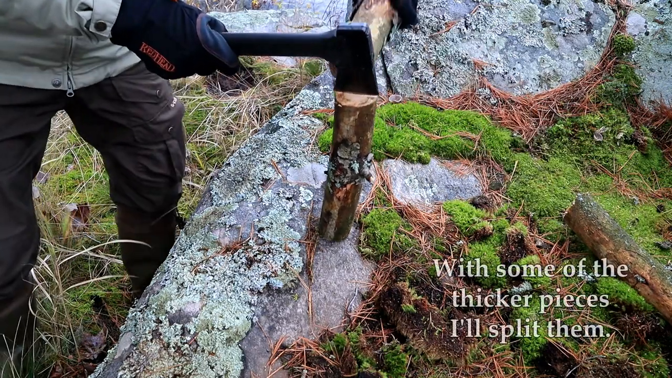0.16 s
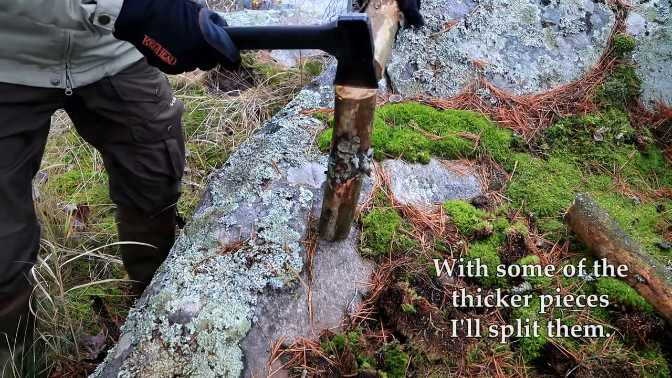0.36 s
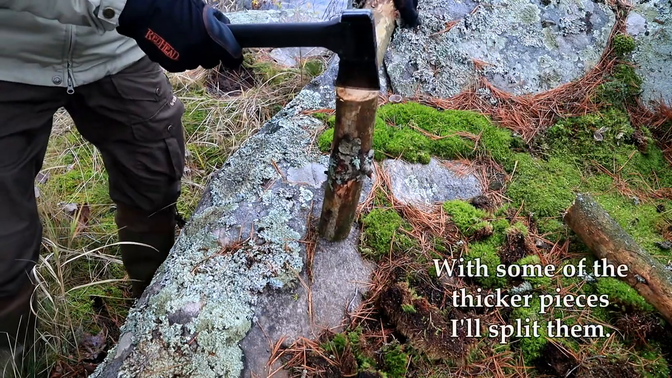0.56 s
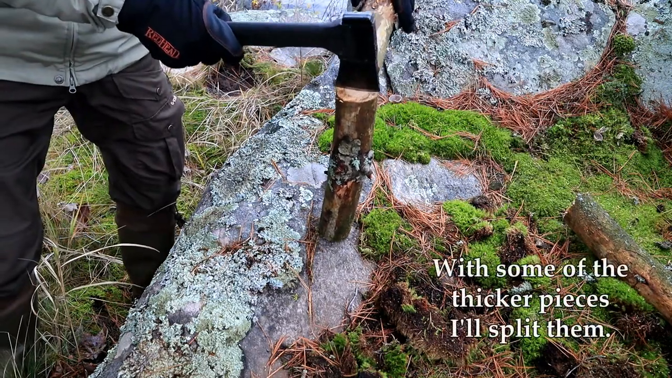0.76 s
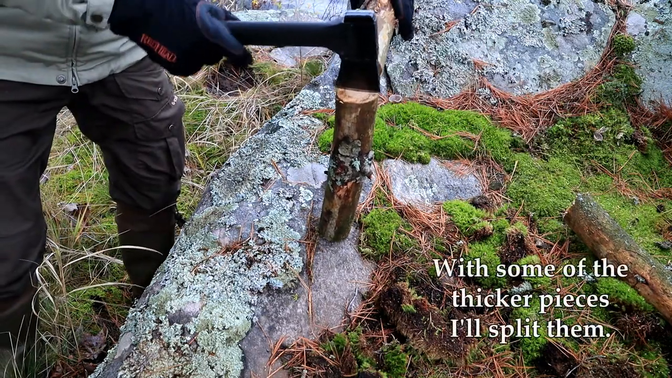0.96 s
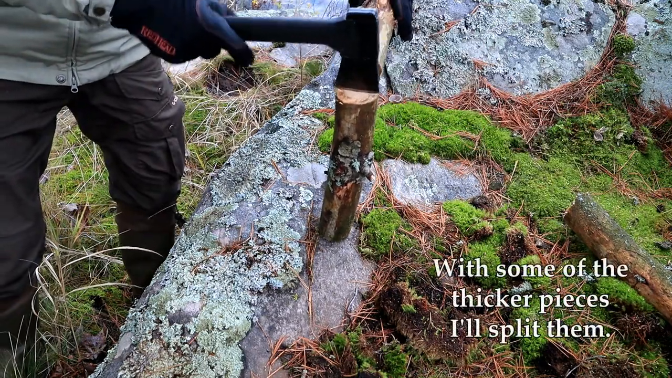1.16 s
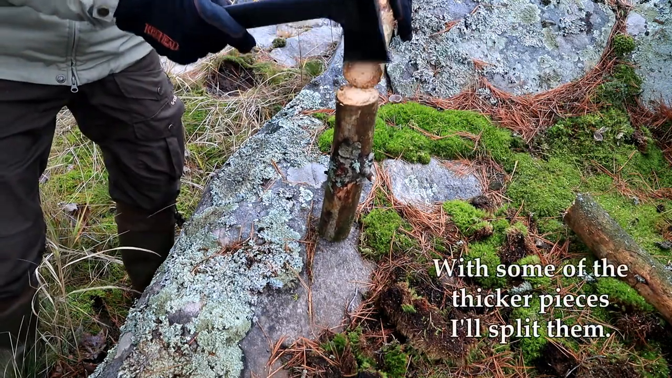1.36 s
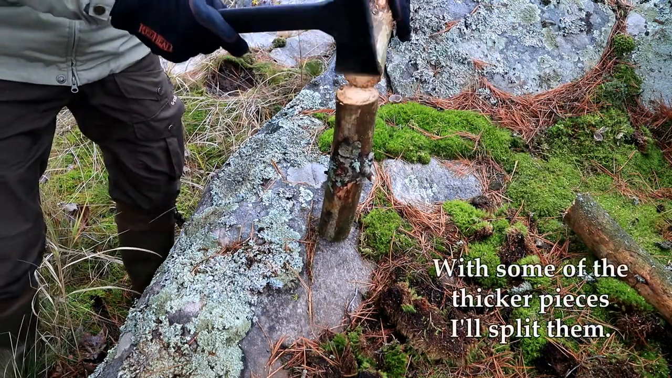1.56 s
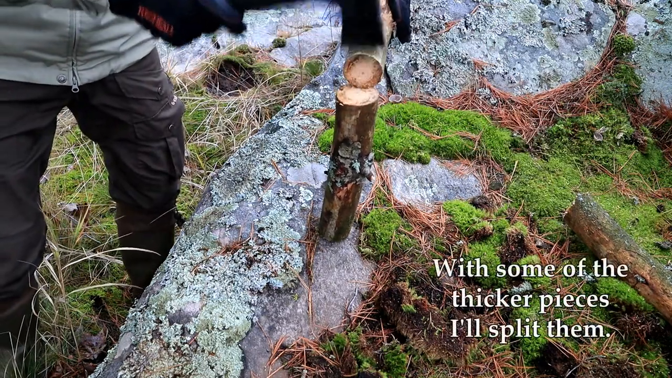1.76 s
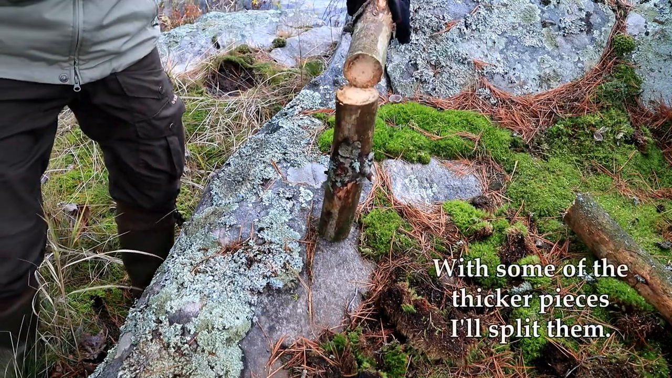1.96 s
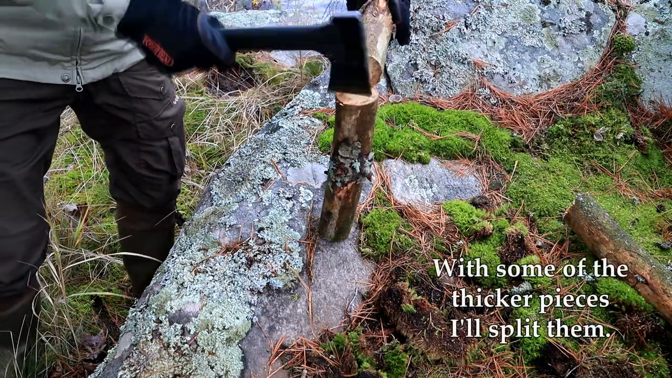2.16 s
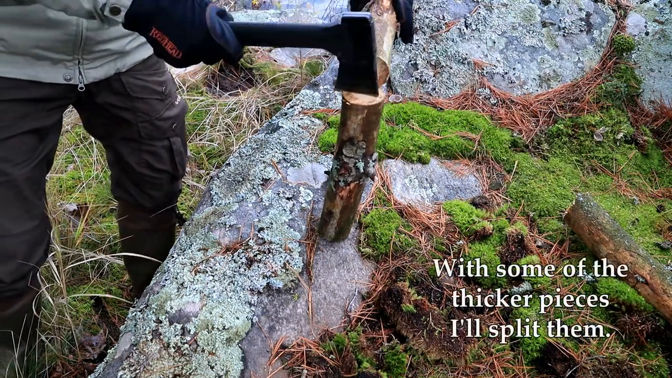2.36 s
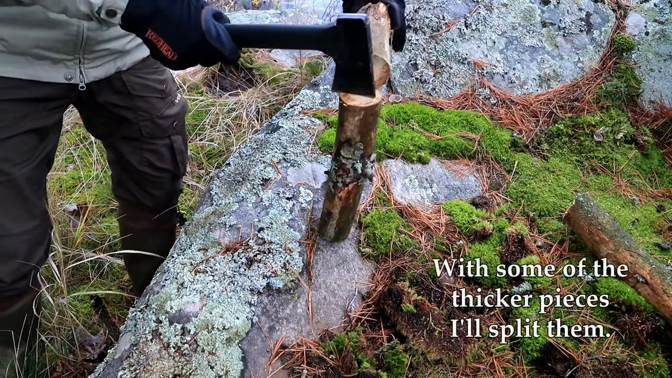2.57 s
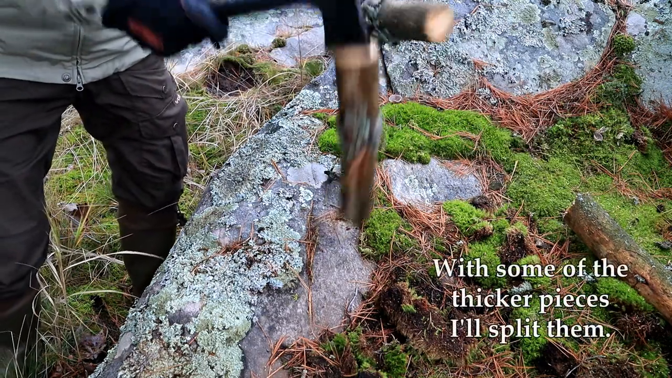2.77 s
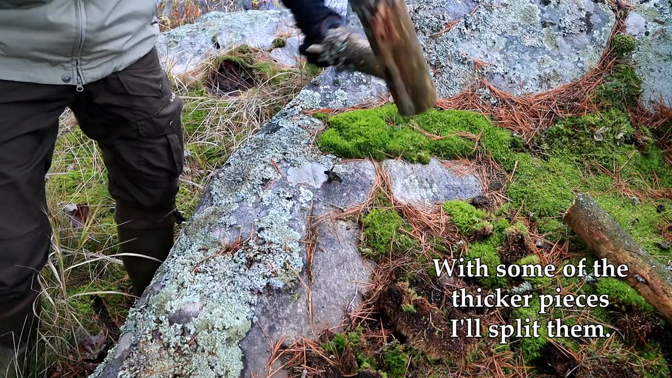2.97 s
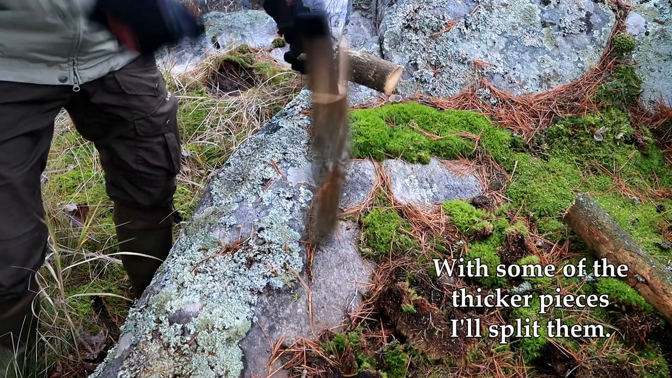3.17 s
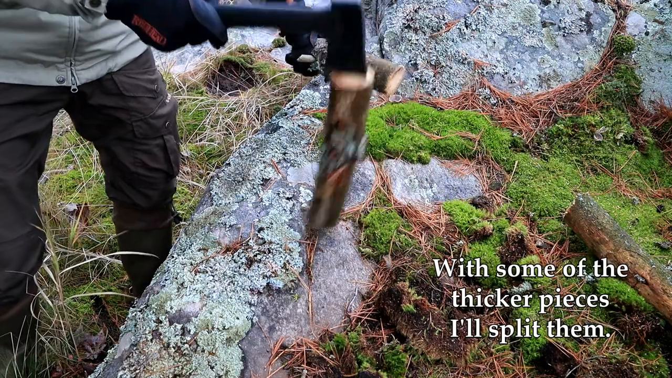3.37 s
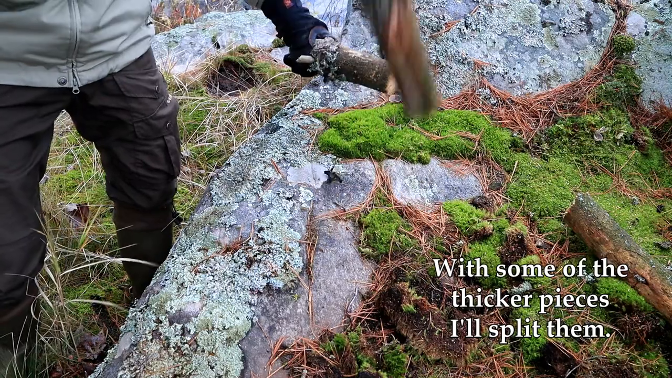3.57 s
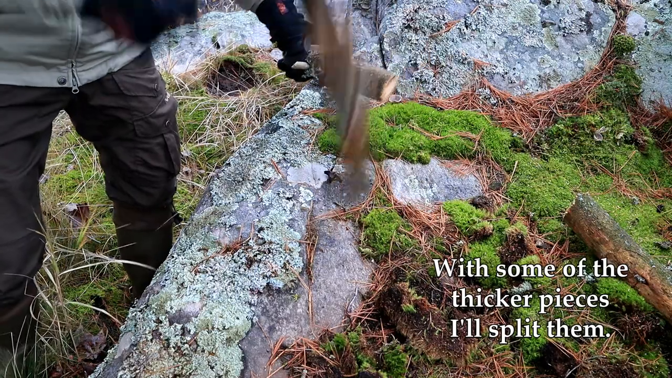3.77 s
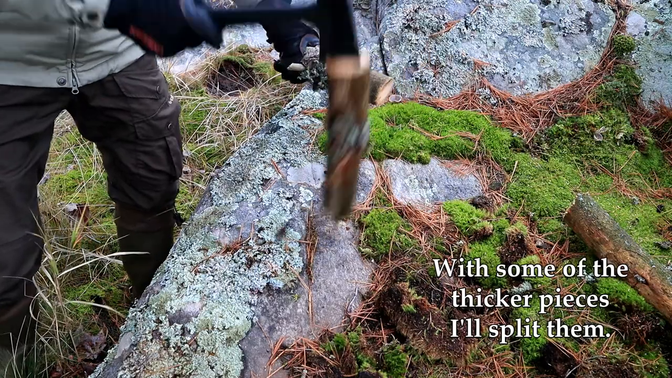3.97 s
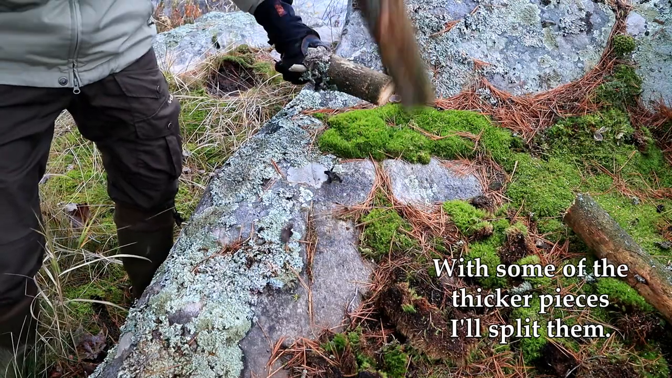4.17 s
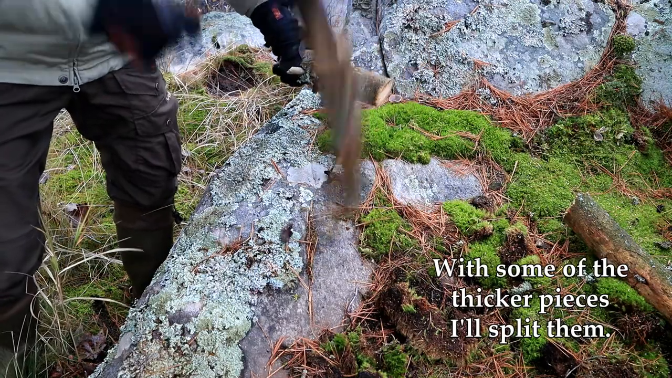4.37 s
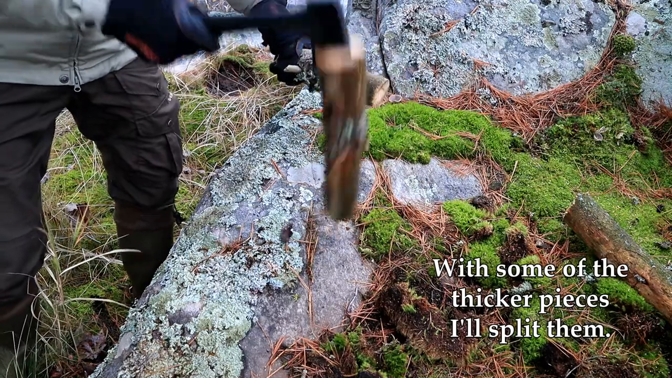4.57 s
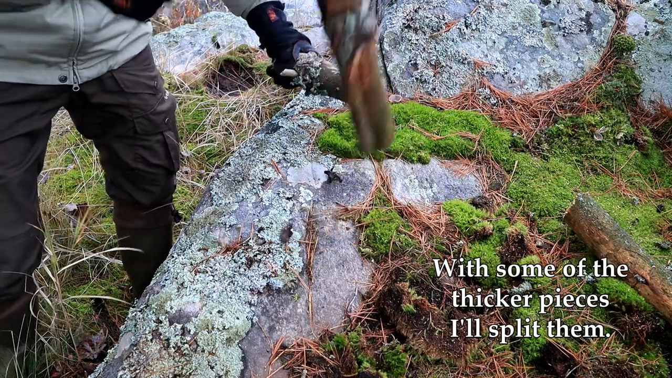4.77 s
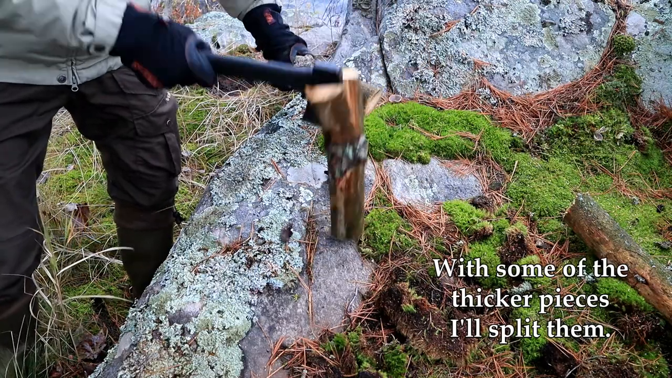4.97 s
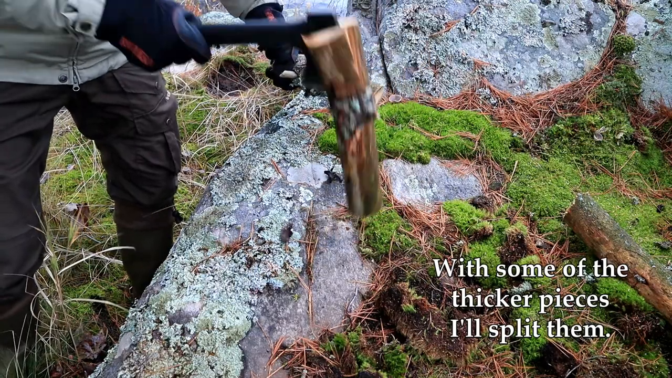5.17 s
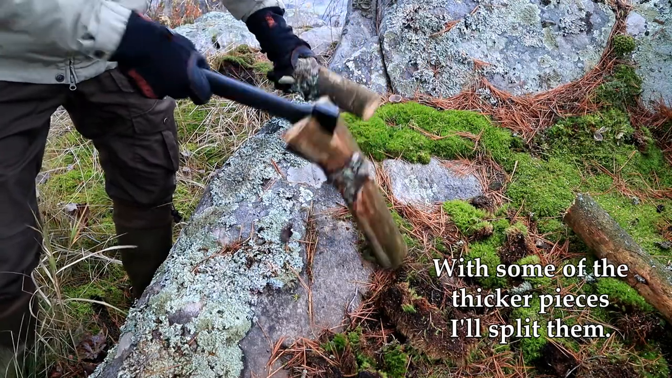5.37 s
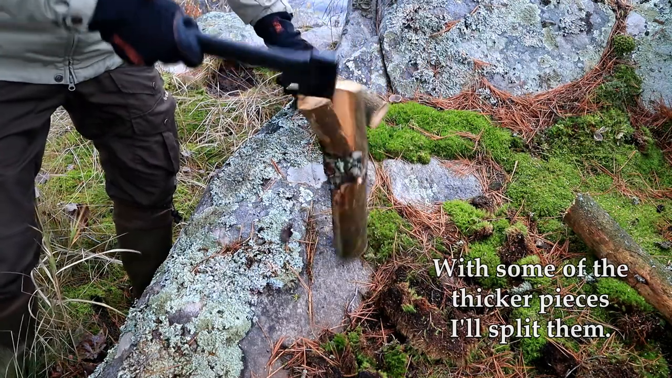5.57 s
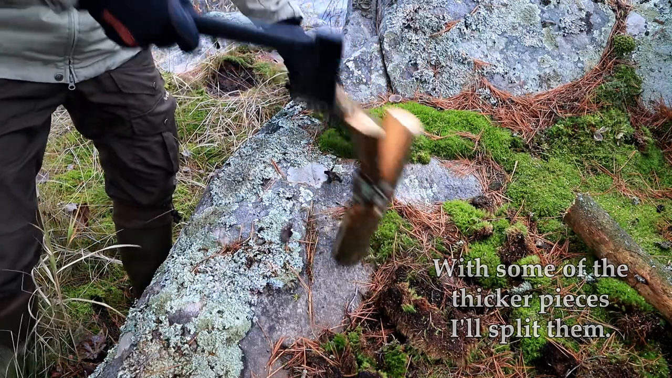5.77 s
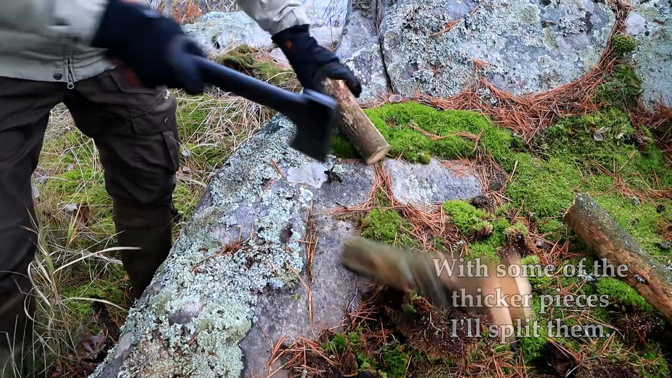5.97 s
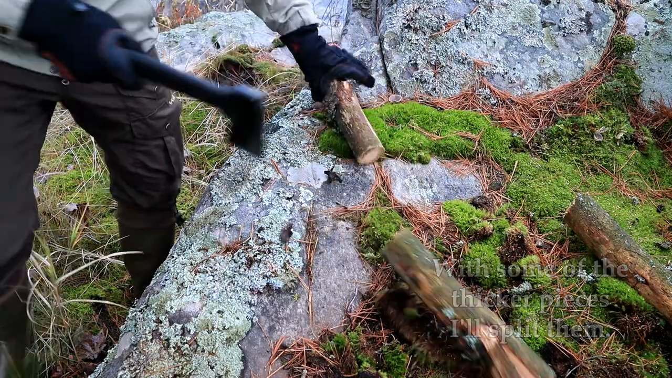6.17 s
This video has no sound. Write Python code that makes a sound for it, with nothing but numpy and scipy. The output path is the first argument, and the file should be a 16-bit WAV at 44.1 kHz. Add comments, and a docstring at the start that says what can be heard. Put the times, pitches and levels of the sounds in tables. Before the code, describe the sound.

Close, hard knocks of a log and hatchet on stone end in splintering wood, over a faint forest wash and light wind.

```python
"""A faint scuff and a light knock: a hatchet is set in a short log. The log is then knocked on bare rock
until it splits and a half drops into the moss. Each blow layers a woody ring, a ground thump and a crunch;
the handle hums after the hard ones, and fibres crack and tear. Rock and trunks throw the sound back over
rustling clothes, a bed of far trees and wind brushing the microphone.
The close blows overload the recorder, whose gain ducks and comes back."""
import sys
import numpy as np
from scipy import signal
from scipy.fft import rfft, irfft, next_fast_len
from scipy.io import wavfile
from scipy.ndimage import minimum_filter1d

SR = 44100
rng = np.random.default_rng(int(sys.argv[2]) if len(sys.argv) > 2 else 0)


def log_audio(samples):
    """Write samples as a 16-bit WAV file to the path given in sys.argv[1]."""
    # one column per channel
    frames = np.atleast_2d(samples).T
    # limit to full scale, then quantise
    limited = np.clip(frames, -1, 1)
    pcm = np.round(limited * 32767).astype(np.int16)
    wavfile.write(sys.argv[1], SR, pcm)


N = 274516
TIME = np.arange(N) / SR

# the blows: t/s, knock level/dB, contact f/Hz, log pitch/ratio, thump/dB, crunch/dB, hum/dB, steel/dB
BLOWS = [(0.3525, -5.3, 1230, 0.95, -32, -35, -60, -70), (2.2013, 8.0, 860, 0.95, -2.5, -7, -12.5, -65),
         (3.2341, 6.5, 950, 0.78, 9, -2.8, -19, -72), (3.8800, 9.6, 900, 0.95, 4.5, -6.5, -17.5, -72),
         (4.4587, 6.3, 1400, 1.03, 3.6, -3, -50, -50), (4.9549, 10.5, 600, 0.74, -10, -11, -50, -64)]
# ringing modes: f/Hz, level/dB, t60/s
LOG_MODES = [(380, -14, .03), (560, -4.5, .021), (757, -2.5, .018), (1030, -5.5, .024), (1423, -5, .024),
             (1646, -3.2, .023), (1976, -3, .021), (2492, -10.5, .02), (2786, -10, .016),
             (3367, -1.5, .023), (3737, 0, .022), (4906, -7, .016)]
GROUND_MODES = [(92, 0, .016), (175, -3, .016)]
HANDLE_MODES = [(308.8, 0, .3), (312.2, 0, .3)]  # two bending planes beat, so the hum swells before it dies
STEEL_MODES = [(1810, -8, .45), (2270, -5, .45), (3540, -2, .7), (3645, 0, .8), (3760, -3, .7)]
# faint, bright ticks just after hard blows (at 2.296 s and 3.949 s); the other rows are fibres and bark
# giving way: t/s, level/dB, t60/s, brightness f/Hz
CRACKS_AND_TICKS = [(0.035, -35, .06, 1000), (0.682, -44, .01, 8000), (1.784, -37, .025, 7000),
                    (1.946, -40, .03, 800), (2.296, -36, .012, 16000), (3.001, -41, .02, 9000),
                    (3.949, -38, .025, 12000), (4.465, -10, .028, 900), (4.9585, -4, .022, 1900),
                    (4.9646, -1, .018, 2800), (4.9768, -8, .02, 6000), (4.9814, -13, .02, 8000),
                    (5.3935, -26, .05, 5000), (5.3970, -15, .045, 3500), (5.4103, -14, .02, 10000),
                    (5.4135, -21, .025, 10000), (5.4481, -11, .013, 15000), (5.5446, -41, .025, 9000),
                    (5.568, -42, .03, 4000), (5.6045, -29, .05, 1500), (5.6524, -41, .04, 3000),
                    (5.857, -36, .03, 2000), (6.0934, -31.5, .012, 14000), (6.135, -35, .05, 9000),
                    (6.1887, -41, .04, 12000)]
# resonances of the splinters: f/Hz, width/Hz, level/dB
SPLINTER_BANDS = [(1150, 300, -3), (1600, 400, -2), (2090, 130, 6), (2600, 500, -4), (3900, 900, -4),
                  (5300, 1100, -3), (8000, 1400, -4), (13000, 3400, -9.5)]
# dull bumps of wood on steel, ground and glove: t/s, level/dB, f/Hz, t60/s
BUMPS = [(0.036, -30, 1520, .035), (0.4015, -16, 250, .025), (0.4025, -19, 600, .02),
         (1.245, -29, 220, .035), (1.401, -31, 1430, .06), (1.947, -31, 1850, .016),
         (4.4722, -1, 600, .016), (4.965, -7, 2300, .025), (4.9795, -5, 400, .016), (5.396, -16, 260, .035),
         (5.3975, -14, 430, .025), (5.4485, -24, 450, .015), (5.4487, -17, 2090, .025),
         (5.6128, -14.5, 290, .025), (6.137, -27, 150, .05)]
# swells of noise: peak t/s, level/dB, length/s
GRINDS = [(0.13, -52, .28), (1.66, -55, .26), (2.72, -56, .14), (3.33, -51, .04), (4.6, -52, .07),
          (5.355, -46, .04), (6.15, -47, .08)]  # wood grinding on the blade or the ground
BRUSHES = [(0.09, -55, .3), (0.47, -56, .08), (1.02, -49, .09), (1.10, -49, .03), (1.44, -50, .06),
           (1.50, -53, .04), (1.895, -52, .03), (2.70, -56, .1), (5.375, -44, .045), (5.52, -55, .2),
           (5.87, -55, .05), (6.17, -47, .12)]  # gloves, bark and needles brushing past each other
GUSTS = [(0.18, -48, .3), (2.47, -52, .15), (3.05, -48, .45), (3.52, -43, .1), (3.82, -42, .2),
         (4.28, -42, .3), (4.65, -33, .1), (4.79, -34, .08), (5.02, -32, .24), (5.9, -35, .26),
         (6.18, -32, .12)]  # air brushing the microphone
# tone curves of the noise layers and echoes: f/Hz, level/dB
GRIND_COLOUR = [(900, -4), (1500, 0), (2500, -1), (4200, -2), (6000, -7), (12000, -20)]
RUSTLE_COLOUR = [(1200, -5), (2200, 0), (4500, 0), (6500, -2), (8500, 0), (10000, -8), (16000, -11)]
WIND_COLOUR = [(12, -30), (20, 0), (38, -1), (135, -8), (173, -14), (226, -15), (308, -27), (500, -28),
               (650, -58), (1100, -120)]
FOREST_COLOUR = [(30, -7), (100, -2), (270, -5.5), (400, -3.3), (900, -3), (1500, -11), (2400, -19.5),
                 (4500, -24), (7000, -25.5), (8400, -24), (10000, -29), (15000, -29), (16000, -33)]
ROCK_ECHO_COLOUR = [(300, -8), (1000, -2), (2200, 0), (5000, 0), (9000, -3), (16000, -12)]
TRUNK_ECHO_COLOUR = [(150, -12), (500, -8), (1100, -2), (1900, 1), (2500, 2), (3100, 0), (3650, 4),
                     (4600, -7), (9000, -14), (16000, -22)]

CRUNCH_LAG_S = .0011  # delays the crunch so it lands together with the knock's ring
SWING_LEAD_S, SWING_S, SWING_DB = .07, .22, -56.5  # the sleeve rustles as the arm comes down
LIFT_LAG_S, LIFT_S, LIFT_DB = .125, .09, -53  # and again as the log is lifted for the next blow
STUCK_FROM_S, STUCK_UNTIL_S = 3.0, 4.7  # the log hangs on the blade and is lifted after each blow


def blows():
    """Each blow rings the log, thumps the ground, crushes wood under the edge and rings the hatchet."""
    out = np.zeros(N)
    for s, knock_db, contact_hz, pitch, thump_db, crunch_db, hum_db, steel_db in BLOWS:
        knock = from_db(knock_db) * contact(ring(LOG_MODES, pitch), contact_hz)
        thump = from_db(thump_db) * ring(GROUND_MODES)
        crunch = from_db(crunch_db) * crackle(t60=.016, bright_hz=6000, snap=4.0)
        hum = from_db(hum_db) * ring(HANDLE_MODES, count=20000)
        steel = from_db(steel_db) * ring(STEEL_MODES, count=20000)
        add(out, s, knock + thump)
        add(out, s + CRUNCH_LAG_S, crunch)
        add(out, s, hum + steel)
    return out


def contact(x, hz, q=1.6):
    """The contact is a damped spring: it favours modes near its own rate and hardly drives those above."""
    w = 2 * np.pi * hz
    return signal.lfilter(*signal.bilinear([w * w], [1, w / q, w * w], SR), x)


def ring(modes, pitch=1, count=4096):
    """A struck body rings as dying sines, alternating in sign."""
    return sum((-1) ** k * from_db(db) * fade(t60, count) * np.sin(2 * np.pi * hz * pitch * TIME[:count])
               for k, (hz, db, t60) in enumerate(modes))


def splitting():
    """The wood cracks open; log and pieces bump about. A faint, bright tick trails two hard blows."""
    out = np.zeros(N)
    for s, db, t60, bright_hz in CRACKS_AND_TICKS:
        add(out, s, from_db(db) * crackle(t60, bright_hz, snap=6.0))
    for s, db, hz, t60 in BUMPS:
        add(out, s, from_db(db) * thud(hz, t60))
    return out


def crackle(t60, bright_hz, snap, grain_db=4.0, count=4096):
    """A first snap and a dying burst of tiny clicks, coloured by the splinter resonances."""
    clicks = rng.standard_normal(count)
    clicks *= from_db(grain_db * np.minimum(rng.exponential(1, count), 4))  # a few grains stick out
    clicks /= clicks.std()
    clicks[0] += snap
    splinters = sum((-1) ** k * from_db(db) * signal.lfilter(*signal.iirpeak(hz, hz / width, SR), clicks)
                    for k, (hz, width, db) in enumerate(SPLINTER_BANDS))
    burst = low_pass(splinters, bright_hz, order=1)
    return burst / burst.std() * fade(t60, count)


def thud(hz, t60):
    """A dull bump: one heavily damped mode with a soft attack."""
    return low_pass(ring([(hz, 0, t60)]), 3 * hz)


def grinding():
    """Wood is rubbed under load: a gritty scrape that swells and fades."""
    return np.sqrt(swell_power(GRINDS)) * noise(GRIND_COLOUR) * flutter(per_s=350, depth_db=3.5)


def rustling(stir_db=-64):
    """Cloth rustles with every swing and lift of the arm; gloves and bark brush in between."""
    moves = list(BRUSHES)
    for s, *_ in BLOWS:
        moves.append((s - SWING_LEAD_S, SWING_DB, SWING_S))
        if STUCK_FROM_S < s < STUCK_UNTIL_S:
            moves.append((s + LIFT_LAG_S, LIFT_DB, LIFT_S))
    stir = from_db(stir_db) * flutter(per_s=7, depth_db=2.5)  # clothes are never quite still
    envelope = np.sqrt(stir ** 2 + swell_power(moves))
    return envelope * noise(RUSTLE_COLOUR) * flutter(per_s=250, depth_db=2.8)


def ticks(per_s=5, level_db=-50, spread_db=2.5):
    """Needles and flakes of bark snap faintly, at random moments."""
    out = np.zeros(N)
    for s in np.flatnonzero(rng.random(N) < per_s / SR) / SR:
        gain = from_db(level_db + spread_db * rng.standard_normal())
        add(out, s, gain * crackle(t60=.018, bright_hz=8000, snap=6.0))
    return out


def wind(breeze_db=-63, rise_db_per_s=2.6):
    """Low, lumpy buffeting on the microphone: gusts ride on a steadily freshening breeze."""
    breeze = from_db(breeze_db + rise_db_per_s * TIME)
    envelope = np.sqrt(breeze ** 2 + swell_power(GUSTS))
    return envelope * noise(WIND_COLOUR) * flutter(per_s=18, depth_db=1.3)


def forest(level_db=-47.7):
    """Far trees lay a steady, dark wash under everything."""
    return from_db(level_db) * noise(FOREST_COLOUR)


def echo(x, colour, level_db, t60, build_s):
    """Scattered reflections build into a diffuse tail."""
    build_up = 1 - np.exp(-TIME[:SR] / build_s)
    tail = noise(colour, count=SR) * fade(t60, count=SR) * build_up
    return from_db(level_db) * signal.fftconvolve(x, tail / np.linalg.norm(tail))[:N]


def noise(colour, count=N):
    """Noise of rms 1 shaped by a tone curve, rolling off steeply beyond its ends."""
    hz, db = np.transpose(colour)
    size = next_fast_len(count, real=True)
    bin_hz = np.maximum(np.fft.rfftfreq(size, 1 / SR), 1)
    skirts = np.minimum(1, np.minimum(bin_hz / hz[0], hz[-1] / bin_hz)) ** 2
    gain = from_db(np.interp(np.log(bin_hz), np.log(hz), db)) * skirts
    x = irfft(rfft(rng.standard_normal(size)) * gain, size)[:count]
    return x / x.std()


def swell_power(rows):
    """Summed power of bell-shaped swells, from rows of t/s, level/dB, length/s."""
    return sum(from_db(db) ** 2 * np.exp(-(2 * (TIME - s) / length_s) ** 2) for s, db, length_s in rows)


def flutter(per_s, depth_db):
    """A gain that wanders at random."""
    return from_db(depth_db * np.interp(TIME * per_s, np.arange(N), rng.standard_normal(N)))


def fade(t60, count):
    """An envelope that loses 60 dB in t60 seconds."""
    return np.exp(-np.log(1000) * TIME[:count] / t60)


def low_pass(x, hz, order=2):
    """Roll off the top above hz."""
    return signal.sosfilt(signal.butter(order, min(hz, .45 * SR), fs=SR, output="sos"), x)


def from_db(db):
    """Decibels to gain."""
    return 10 ** (np.asarray(db) / 20)


def add(track, s, sound):
    """Mix a sound in at time s."""
    at = round(s * SR)
    track[at:at + len(sound)] += sound[:N - at]


def scene():
    """The chopping, scattered by rock and trunks, over far trees, gusts and close rustle."""
    wood = blows() + splitting()
    rock = echo(wood, ROCK_ECHO_COLOUR, level_db=-26, t60=.05, build_s=.01)
    trunks = echo(wood, TRUNK_ECHO_COLOUR, level_db=-35, t60=.42, build_s=.004)
    return (wood + rock + trunks + forest() + wind() + rustling() + grinding() + ticks())[None]


def gain_control(x, threshold_db=-1.0, hold_s=.05, release_db_per_s=340, attack_s=.003, range_db=12):
    """Peaks over the threshold duck the gain; it holds a moment and then climbs back."""
    over_db = np.clip(20 * np.log10(np.abs(x) + 1e-9) - threshold_db, 0, range_db)
    hold = int(hold_s * SR) // 2 * 2 + 1
    held_db = -minimum_filter1d(-over_db, hold, origin=hold // 2)
    release_ramp = release_db_per_s * TIME
    duck_db = np.maximum.accumulate(held_db + release_ramp) - release_ramp
    attack_pole = np.exp(-1 / (attack_s * SR))
    return x * from_db(-signal.lfilter([1 - attack_pole], [1, -attack_pole], duck_db))


def record(dry):
    """The gain ducks too late for the loud attacks, which clip; a steep high cut takes off the top."""
    clipped = np.clip(gain_control(dry[0]), -1, 1)
    high_cut = signal.ellip(10, .1, 70, 16300, fs=SR, output="sos")  # corner at 16.3 kHz
    return signal.sosfilt(high_cut, clipped)[None]


dry = scene()
out = record(dry)
log_audio(out)
```